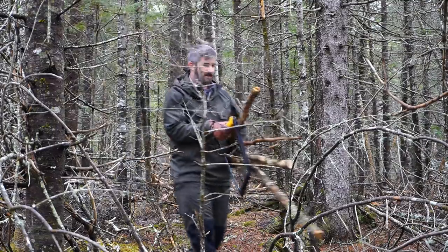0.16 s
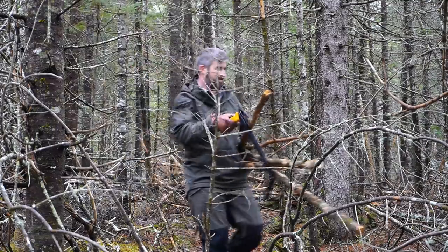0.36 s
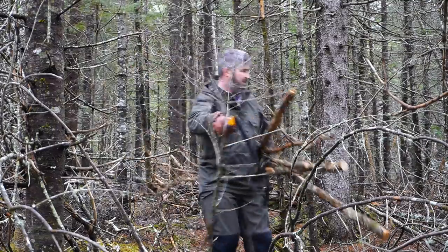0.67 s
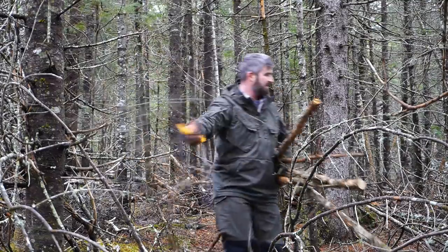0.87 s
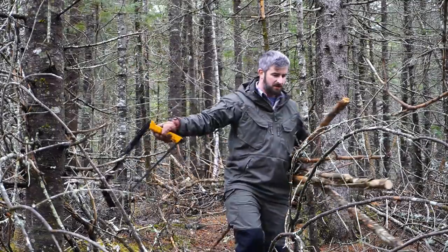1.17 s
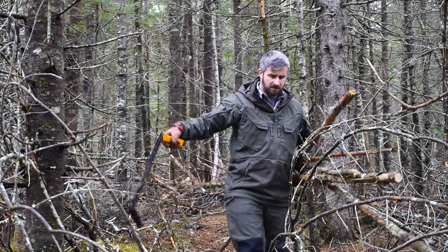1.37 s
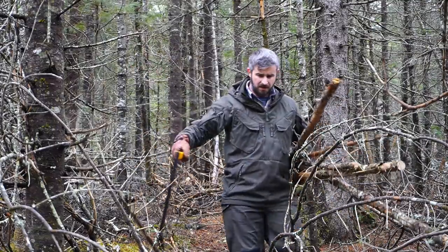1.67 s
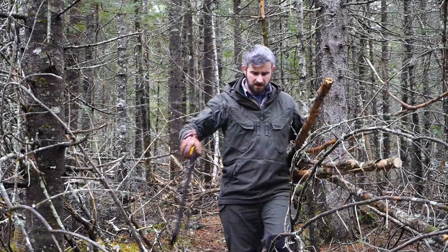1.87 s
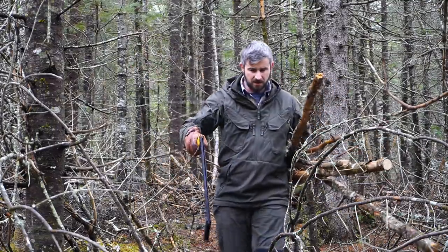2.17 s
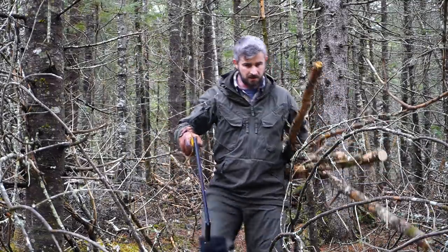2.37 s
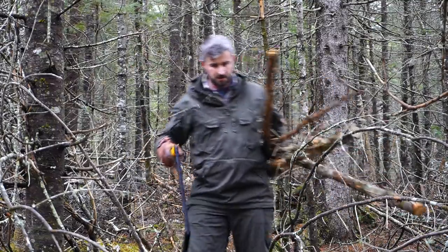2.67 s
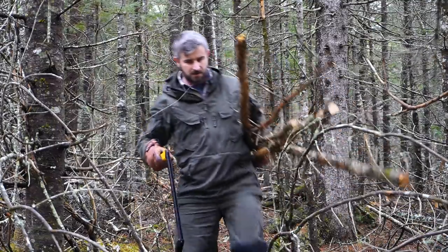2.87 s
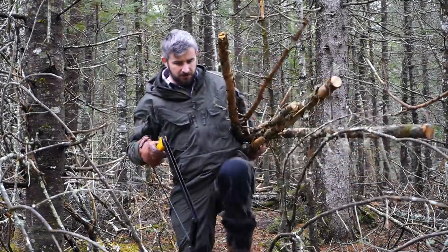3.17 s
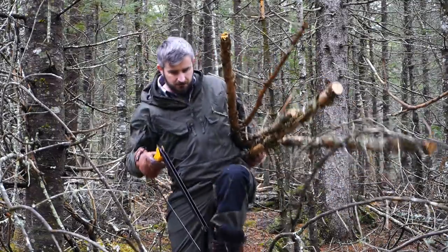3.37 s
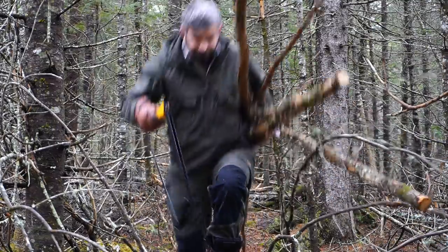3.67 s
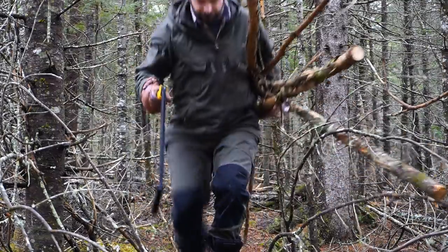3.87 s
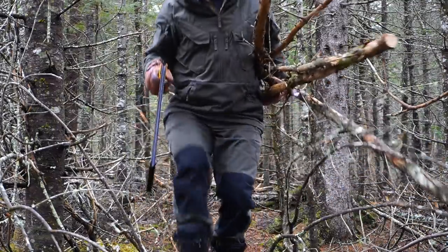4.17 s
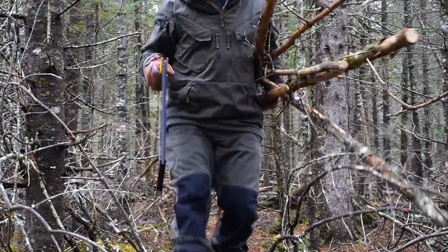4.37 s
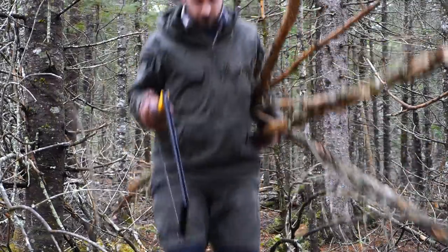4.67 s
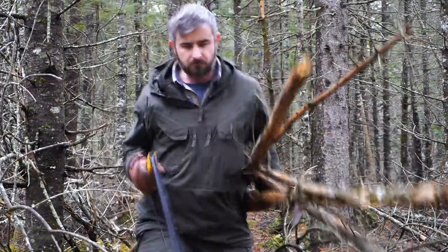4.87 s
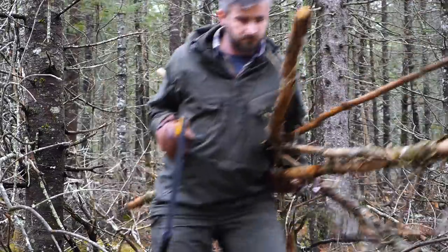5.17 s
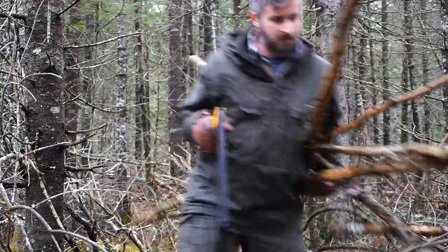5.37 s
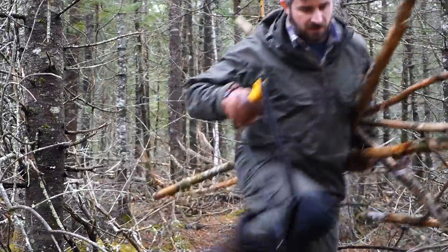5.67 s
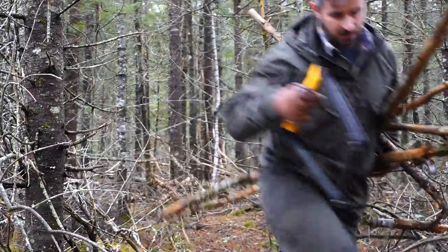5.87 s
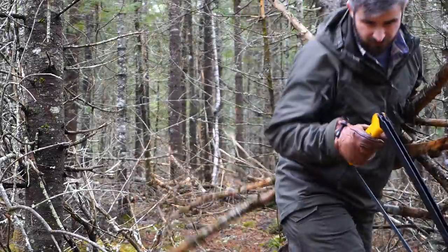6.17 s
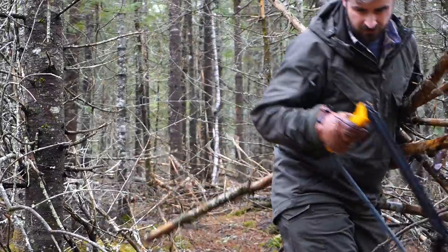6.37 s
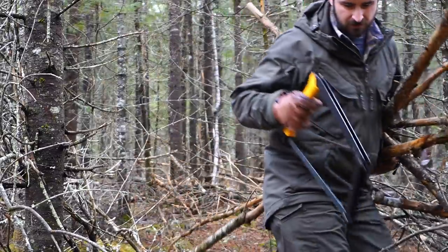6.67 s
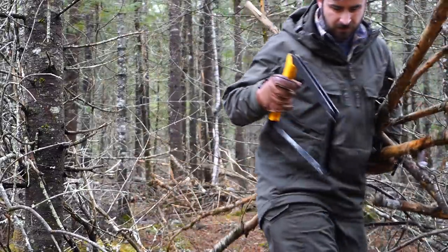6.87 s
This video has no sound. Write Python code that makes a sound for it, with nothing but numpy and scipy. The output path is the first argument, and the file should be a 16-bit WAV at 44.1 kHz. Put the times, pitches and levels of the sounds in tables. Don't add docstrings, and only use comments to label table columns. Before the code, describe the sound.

Close mono sound of dead branches in a forest. Soft twig snaps, low knocks and light metallic pings mix with dry rustling for two seconds, then a sparse lull with sleeve hiss and a few sharper snaps. After four seconds comes a tiny wood squeak and a triple crack, then a dense burst of bright, hard breaking. Clacks, scratchy brushing and jolting thuds continue unevenly to the end over faint air rumble.

```python
import sys
import numpy as np
from scipy import signal
from scipy.fft import rfft, irfft
from scipy.io import wavfile
from scipy.ndimage import uniform_filter1d

SR = 44100
rng = np.random.default_rng(int(sys.argv[2]) if len(sys.argv) > 2 else 0)


def level_to_linear(level):
    exponent = np.asarray(level, float) / 20
    return 10 ** exponent


def int16_out(signal):
    q = np.round(np.clip(np.atleast_2d(signal).T, -1, 1) * 32767)
    wavfile.write(sys.argv[1], SR, q.astype(np.int16))


N = 309582

# (time [s], wood pitch [Hz], wood ring [dB], fibre crack [dB], splinter [dB])
BREAKS = [(0.5734, 4100, -21.5, -26.5, -17.5), (0.867, 3550, -22, -24.5, -31.5),
          (1.1434, 3670, -23, -28.5, -19.5), (2.3001, 3600, -20.5, -30, -18),
          (3.3608, 5750, -6.5, -16.5, -8), (3.361, 1560, -9, -40, -34), (3.5143, 3430, -20, -23, -19),
          (3.5159, 2390, -10, -15.5, -20), (4.324, 1900, 1.5, -17.5, -2), (4.3863, 1880, -1, -18.5, -5.5),
          (4.4779, 1900, -9, -19, -9.5), (4.557, 3780, -15, -48, -9), (4.5859, 3800, -7.5, -42, -23),
          (4.6081, 3520, 2, -14.5, -8.5), (4.648, 3610, 3, -37, -11), (4.75, 3240, -15.5, -20, -18),
          (4.8475, 8400, -4, -18, -4), (4.851, 2070, -4, -17.5, -21), (5.0776, 3120, -2, -22.5, -12.5),
          (5.1958, 4110, -17.5, -24, -19.5), (5.3477, 920, -1, -20, -20.5),
          (5.3866, 3870, -15, -19.5, -16.5), (5.637, 970, -4.5, -21, -24), (5.6691, 1840, -13, -25, -22.5),
          (6.041, 780, -5, -20, -26), (6.7026, 5540, -17, -29.5, -13), (6.8092, 1800, -6, -12.5, -0.5)]
# (time [s], wood pitch [Hz], wood ring [dB], fibre crack [dB], splinter [dB])
TEARS = [(0.0617, 2560, -41, -45.5, -45), (0.225, 955, -31, -49, -58), (0.4, 2110, -45, -38.5, -43.5),
         (0.628, 1800, -41, -32.5, -39), (0.8319, 3100, -31, -29.5, -41.5), (3.1486, 2600, -42, -49, -36.5),
         (3.594, 5470, -41, -41.5, -32), (4.812, 2180, -31, -25.5, -26), (4.8935, 1980, -12.5, -35, -37),
         (5.445, 1160, -20, -56, -52), (6.6034, 3540, -40, -46.5, -38)]
# (time [s], wood pitch [Hz], wood ring [dB], splinter [dB])
CLACKS = [(0.018, 3520, -30, -37), (0.1677, 980, -33, -64), (0.295, 1300, -36, -59),
          (0.6938, 2220, -26, -61), (1.0734, 3050, -31, -25.5), (2.6573, 1140, -38, -25),
          (3.999, 1380, -42, -60), (4.097, 1140, -27, -38), (4.162, 3080, -35, -43),
          (4.2338, 3900, -33, -34.5), (5.2813, 3440, -26.5, -24.5), (5.341, 1600, -28, -25),
          (5.479, 1780, -24, -19.5), (5.5962, 870, -22, -39), (5.6517, 1650, -38, -53),
          (5.702, 2320, -26.5, -35), (5.781, 1370, -30, -28), (5.8325, 2850, -24, -21),
          (5.86, 5900, -28, -23.5), (6.065, 3190, -18, -17.5), (6.181, 2850, -23.5, -28.5),
          (6.218, 1040, -37, -21), (6.2741, 1040, -18, -56), (6.395, 4530, -31, -31),
          (6.449, 5370, -40, -41), (6.518, 1670, -38, -41), (6.546, 1850, -18.5, -36),
          (6.7353, 4740, -27, -22), (6.8045, 4800, -26, -12), (6.8294, 4260, -22, -11.5),
          (6.828, 6050, -36, -9), (0.846, 2170, -20.5, -45), (0.852, 3500, -26, -35),
          (0.421, 2300, -34, -58), (5.433, 4000, -33, -39), (5.536, 2220, -34, -45),
          (5.559, 4000, -38, -46), (6.524, 2000, -34, -48), (6.645, 3500, -45, -47), (4.44, 4200, -38, -50),
          (4.539, 3000, -29, -41), (4.516, 3000, -34, -50), (4.621, 3600, -28, -29),
          (4.8865, 3500, -21, -33), (5.807, 1300, -26, -40), (5.954, 3000, -27.5, -37),
          (6.138, 2300, -29, -42), (6.814, 1900, -16.5, -29), (6.195, 2330, -25, -47)]
# (time [s], peak level [dB], pitch [Hz])
TICKS = [
    (4.953, -30, 4960),
    (4.9644, -27, 1690),
    (4.9788, -23.5, 1920),
    (5.0174, -28, 3360),
    (5.0337, -30, 1210),
    (5.1297, -33, 3230),
    (5.2965, -39, 2390),
    (5.4054, -17, 1300),
    (6.0402, -35, 2170),
    (6.2582, -32, 2410),
]
# (time [s], splinter level [dB], ring pitch [Hz])
TWIGS = [(0.206, -44, 5000), (0.463, -48, 3710), (1.254, -32.5, 3540), (1.325, -37, 3480),
         (1.397, -36.5, 8900), (1.521, -37, 7200), (2.07, -40, 8100), (2.134, -34, 4070),
         (2.283, -32, 9430), (2.629, -46, 9000), (2.645, -33, 9200), (2.727, -40, 8050),
         (3.12, -24.5, 8400), (3.66, -27.5, 8900), (3.858, -41, 7750), (3.974, -47, 3520),
         (4.008, -40, 3960), (4.137, -33, 3540), (4.6399, -2, 7200), (4.6478, -3, 7940), (4.6524, 7, 6800),
         (4.6557, -4, 8110), (4.658, -4.5, 5600), (4.664, -11, 7050), (4.6754, -10, 7600),
         (4.7698, 1.5, 8930), (4.775, -5, 7300), (4.794, -11, 7600), (4.8232, -24, 8510),
         (4.876, -15, 8100), (4.881, -14, 7680), (5.003, -23, 3500), (5.061, -33, 3660), (5.165, -33, 5560),
         (5.332, -17, 3840), (5.397, -14.5, 5900), (5.581, -39, 5200), (5.609, -15, 3700),
         (5.718, -30, 8600), (5.768, -26.5, 8080), (5.824, -31, 4180), (6.091, -18, 8850),
         (6.121, -7, 8600), (6.308, -37, 8800), (6.352, -26, 7750), (6.359, -21.5, 8400),
         (6.422, -27.5, 8500), (6.454, -24, 7800), (6.477, -26, 8900), (6.695, -25, 11900),
         (6.752, -27, 8250), (6.7734, -29, 7940), (6.779, -18, 6960), (6.814, -6, 9100), (6.832, -20, 8050),
         (6.925, -47, 8040), (6.95, -31.5, 7200), (4.561, -16, 7600), (0.813, -38, 6000),
         (3.111, -36, 10000)]
# (frequency [Hz], level [dB])
CRACK_SPECTRUM = [(500, -38), (1000, -2.5), (2500, 1.5), (5500, -3), (8000, -32)]
# (frequency [Hz], level [dB])
SPLINTER_SPECTRUM = [(4000, -11), (6000, -3.5), (8300, 3), (10000, -5), (13000, -5), (15500, -9),
                     (16500, -38)]
# (time [s], level [dB])
BOUGH_CRACKS = [
    (4.324, -12),
    (4.3859, -14.5),
    (4.4778, -18),
]
# (frequency [Hz], level [dB], t60 [s])
BOUGH_MODES = [(3920, -1, 0.011), (5280, 4.5, 0.0084), (6340, -7, 0.0084), (7800, 1, 0.0098),
               (9430, 8.5, 0.0059)]
# (time [s], peak level [dB], pitch [Hz])
KNOCKS = [(0.034, -41, 502), (0.167, -36, 920), (0.837, -31, 762), (1.193, -38.5, 236), (1.482, -42, 127),
          (1.612, -48, 960), (1.995, -41.5, 290), (2.067, -38, 125), (2.299, -39.5, 535), (2.381, -41, 483),
          (2.607, -37.5, 151), (3.358, -32.5, 228), (3.511, -42.5, 174), (3.798, -43.5, 507),
          (3.987, -38.5, 534), (4.533, -35.5, 236), (4.556, -34, 247), (4.674, -25.5, 473),
          (4.997, -38, 543), (5.207, -32, 517), (5.31, -20, 474), (5.346, -20.5, 279), (5.442, -29, 810),
          (5.927, -25.5, 103), (6.038, -28, 916), (6.199, -21.5, 330), (6.515, -31, 260), (6.783, -25, 482),
          (6.808, -19, 432), (6.855, -25.5, 505), (1.342, -45.5, 372), (6.798, -32.5, 604),
          (6.845, -29, 428), (4.588, -41, 415), (4.665, -32, 387), (5.93, -37, 694), (5.796, -36, 1130),
          (5.905, -39, 1000), (6.226, -30, 940), (0.74, -48, 590), (2.301, -38.5, 308)]
# (time [s], peak level [dB], pitch [Hz])
JOLTS = [(0.093, -37.5, 335), (0.263, -45, 490), (0.763, -33.5, 366), (0.801, -37, 452),
         (1.011, -37.5, 393), (1.092, -45, 420), (1.317, -30.5, 373), (1.519, -37, 349), (2.654, -42, 416),
         (2.894, -49, 570), (3.667, -44.5, 616), (4.026, -42.5, 500), (4.323, -26, 380),
         (4.384, -26.5, 358), (4.476, -29.5, 377), (4.605, -31.5, 420), (4.654, -26.5, 317),
         (4.728, -34, 597), (4.742, -28.5, 380), (4.766, -27, 322), (4.793, -21.5, 358), (4.801, -29, 600),
         (4.81, -24, 617), (4.825, -50, 640), (4.844, -26.5, 437), (5.266, -29.5, 300), (5.288, -29.5, 480),
         (5.324, -27.5, 500), (5.358, -20.5, 295), (5.377, -30, 640), (5.386, -19.5, 398),
         (5.409, -29, 216), (5.511, -42, 260), (5.583, -36, 380), (5.591, -25.5, 300), (5.621, -37, 276),
         (5.639, -22.5, 365), (5.666, -27.5, 362), (5.684, -38, 403), (5.76, -39, 325), (5.825, -41, 464),
         (5.888, -25.5, 396), (5.901, -27, 312), (5.918, -32, 415), (5.958, -34.5, 608), (6.163, -38, 390),
         (6.221, -32.5, 428), (6.262, -38, 480), (6.318, -44, 415), (6.4, -39.5, 476), (6.545, -32, 332),
         (6.757, -36, 302), (6.825, -37, 420), (6.833, -30.5, 452)]
# (time [s], level [dB], centre [Hz], t60 [s])
SWEEPS = [(0.498, -34.5, 4760, 0.041), (0.532, -41.5, 7000, 0.16), (.585, -37.5, 7000, 0.3),
          (0.987, -36.5, 9000, 0.03), (3.129, -35, 7900, 0.032), (3.52, -39.5, 5960, 0.24),
          (3.65, -46.5, 894, 0.48), (4.035, -49, 2480, 0.49), (4.088, -42, 3930, 0.083),
          (4.485, -65, 5000, 0.45), (4.657, -24, 9000, 0.33), (4.95, -32.5, 6000, 0.094),
          (5.13, -31, 1860, 0.049), (5.294, -29.5, 6000, 0.063), (5.401, -25, 3840, 0.06),
          (5.517, -29, 6050, 0.037), (5.9, -39.5, 4320, 0.25), (6.834, -36, 6000, 0.12)]
# (time [s], peak level [dB], mode nearest the spot [Hz])
SCRAPES = [(.38, -42.5, 2130), (0.401, -34, 2455), (.453, -49, 1900), (.495, -44, 2320), (.531, -48, 2010),
           (.6295, -33, 4300), (0.596, -38, 2060), (.629, -28.5, 1900), (0.634, -30.5, 2320),
           (0.695, -36, 2010), (1.103, -54, 1900), (1.141, -47, 2568), (1.189, -50.5, 1900),
           (1.46, -54, 2455), (1.486, -56, 1996), (1.501, -52, 2568), (1.076, -45, 3000),
           (1.735, -53, 1900), (1.659, -54, 2132), (1.685, -51.5, 1900), (1.757, -49.5, 1900),
           (1.832, -43, 2070), (1.849, -46.5, 1900), (1.87, -43, 2020), (1.897, -50, 1900),
           (1.917, -38.5, 1900), (1.954, -49.5, 2132), (1.997, -60, 2132), (2.03, -71, 2132)]
# (frequency [Hz], level [dB], t60 [s])
FRAME_MODES = [(1900, 15.5, 0.19), (1996, 15.5, 0.13), (2132, -16, 0.32), (2320, 7, 0.19), (2455, 6, 0.15),
               (2568, -3, 0.22), (2670, -23, 0.17), (3000, 7, 0.095), (3900, -16, 0.15), (4300, -2, 0.054)]
# (time [s], effort [dB])
PUSH = [(0.0, -55), (.31, -56.5), (.6, -49), (1.06, -52.5), (1.52, -62.5), (1.84, -55), (2.44, -69),
        (2.7, -64), (3.2, -58), (4.3, -63.5), (4.62, -50.5), (4.75, -40), (5.05, -51.5), (5.34, -46),
        (6.0, -57), (6.25, -48.5), (6.49, -57), (7.02, -61)]
# (time [s], effort [dB])
DRAG = [(0.0, -56.5), (.51, -59.5), (.95, -51), (1.52, -62.5), (1.84, -56.5), (2.44, -62), (2.79, -58.5),
        (3.3, -61.5), (4.09, -59.5), (4.36, -64), (4.75, -35.5), (5.1, -48), (5.34, -41.5), (5.92, -47.5),
        (6.01, -54), (6.22, -44), (6.49, -55), (7.02, -56)]
# (frequency [Hz], level [dB per Hz])
RUB_SPECTRUM = [(18, -40), (30, -10), (162, -2), (217, 3.5), (405, 1.5), (1100, -0.5), (1500, -1.5),
                (1950, -7), (3300, -120)]
# (frequency [Hz], level [dB per Hz])
SCRATCH_SPECTRUM = [(500, 9), (900, -4), (2000, 6), (4000, 1.5), (7000, -16.5)]
# (frequency [Hz], level [dB per Hz])
HISS_SPECTRUM = [(1760, -87), (3000, -8), (3360, -5), (4470, -2), (5890, -3), (8290, 4.5), (10000, -2.5),
                 (14900, -5), (15900, -36), (16400, -42)]
# (time [s], peak level [dB])
SLIPS = [
    (4.063, -31),
    (4.07, -21.5),
    (4.085, -30),
]
# (frequency [Hz], width [Hz], level [dB])
WEAVE_RIDGES = [(2170, 76, -3), (2400, 32, 3), (3780, 200, -5), (4850, 36, 1), (5280, 80, -1),
                (6100, 220, -11), (7120, 100, -10), (7700, 400, -1), (8400, 160, -3), (8900, 38, -4),
                (9480, 110, -9), (10200, 200, -8)]
# (frequency [Hz], t60 [s])
WOODS_DECAY = [(300, 0.13), (2000, 0.15)]
# (frequency [Hz], level [dB per Hz])
AIR_SPECTRUM = [(12, -32), (20, -0.5), (32, -18), (75, -6.5), (139, -24.5), (707, -19), (3400, -32),
                (3810, -29.5), (14600, -43), (16400, -50)]


def evened(x):
    return x / np.sqrt(np.mean(x ** 2) + 1e-20)


def onset(t, rise_s, power=1):
    return 1 - np.exp(-(t / rise_s) ** power)


def decay(t, t60_s):
    return level_to_linear(-60 * t / t60_s)


def read(points, hz):
    f, value = np.transpose(points)
    return np.interp(np.log(hz + 1), np.log(f + 1), value)


def effort(rows):
    times, level_db = np.transpose(rows)
    return np.interp(np.arange(N) / SR, times, level_db, left=-120, right=-120)


def add(mix, s, sound):
    part = mix[round(s * SR):][:len(sound)]
    part += sound[:len(part)]


def colour(x, points):
    hz = np.fft.rfftfreq(N, 1 / SR)
    below = (points[0][0] * .5, points[0][1] - 40)
    above = (points[-1][0] * 1.05, -90)
    gain = level_to_linear(read([below] + list(points) + [above], hz))
    return evened(irfft(rfft(x) * gain, N))


def tinted(noise, points):
    hz = np.fft.rfftfreq(noise.shape[-1], 1 / SR)
    out = irfft(rfft(noise) * level_to_linear(read(points, hz)), noise.shape[-1])
    return out / out.std(-1, keepdims=True)


def snaps():
    out, t = np.zeros(N), np.arange(9000) / SR
    rows = snap_rows()
    noise = rng.standard_normal((len(rows), 2, len(t)))
    noise[:, :, round(.0004 * SR)] = 3.5
    cracks = tinted(noise[:, 0], CRACK_SPECTRUM)
    splinters = tinted(noise[:, 1], SPLINTER_SPECTRUM)
    dulled = signal.lfilter([.45], [1, -.55], splinters)
    rise = onset(t, 0.00029, 2)
    tear = level_to_linear(-5.0) * decay(t, 0.0012)
    late = level_to_linear(-13.5) * decay(t, 0.041)
    scatter = level_to_linear(-26.5) * decay(t, 0.38) * onset(t, 0.0016)
    for row, crack, splinter, dull in zip(rows, cracks, splinters, dulled):
        s, hz, wood_db, crack_db, splinter_db, t60 = row
        t60 = np.clip(t60, .004, .1)
        shape = rise * (tear + level_to_linear(-3.5) * decay(t, t60) + late)
        ring = np.sin(2 * np.pi * hz * t) + .5 * np.sin(2 * np.pi * 1.219 * hz * t)
        ring *= onset(t, 1.54 / hz, 2)
        wood = level_to_linear(wood_db + 1.0) * decay(t, np.clip(t60, .0055, .02)) * ring
        burst = level_to_linear(crack_db - 0.5) * crack + level_to_linear(splinter_db - 3.0) * splinter
        add(out, s, wood + shape * burst)
        scattered_crack = (level_to_linear(crack_db) + 0.015 * level_to_linear(wood_db)) * crack
        add(out, s, scatter * (scattered_crack + level_to_linear(splinter_db - 0.5) * dull))
    return signal.sosfilt(signal.butter(2, 350, "highpass", fs=SR, output="sos"), out)


def snap_rows():
    rows = [(*row, 0.007) for row in BREAKS] + [(*row, 0.17) for row in TEARS]
    clack_t60_s, clack_fibre_db = 0.01, -9
    for s, hz, db, splinter_db in CLACKS:
        rows.append((s, hz, db, db + clack_fibre_db, splinter_db, clack_t60_s))
    for s, db, hz in TICKS:
        rows.append((s, hz, db, db + clack_fibre_db, db - 16, clack_t60_s))
    for s, db, hz in TWIGS:
        rows.append((s, hz, db - 10.5, db - 24, db - 8.0, 0.0098))
    return rows


def bough():
    out, t = np.zeros(N), np.arange(1500) / SR
    hz, db, t60 = np.transpose(BOUGH_MODES)[:, :, None]
    turns = rng.random((len(BOUGH_CRACKS), len(BOUGH_MODES), 1))
    for (s, crack_db), turn in zip(BOUGH_CRACKS, turns):
        modes = level_to_linear(db) * decay(t, t60) * np.sin(2 * np.pi * (hz * t + turn))
        add(out, s, level_to_linear(crack_db) * onset(t, 0.00056, 2) * modes.sum(0))
    return out


def knocks():
    out, t = np.zeros(N), np.arange(3000) / SR
    rows = list(KNOCKS) + list(JOLTS)
    bark = signal.lfilter([.15], [1, -.88], rng.standard_normal((len(rows), len(t))))
    for (s, peak_db, hz), (detune, turn), crunch in zip(rows, rng.random((len(rows), 2)), bark):
        sagging = hz * (t + 0.13 * 0.0036 * onset(t, 0.0009))
        second_hz = hz * (1.287 + 0.905 * detune)
        ring = np.sin(2 * np.pi * sagging) + 0.51 * np.sin(2 * np.pi * (second_hz * t + turn))
        shape = onset(t, 0.0025, 2) * decay(t, 0.029)
        push = 0.35 * np.sin(2 * np.pi * (130 + 80 * turn) * t)
        push *= onset(t, 0.0037) * decay(t, 0.041)
        hum = 0.042 * (1 + 1.6 * crunch) * np.sin(2 * np.pi * hz * t)
        hum *= onset(t, 0.003, 2) * decay(t, 0.065)
        add(out, s, level_to_linear(peak_db + 8.0) * (shape * (ring + 0.98 * crunch) + push + hum))
    return out


def sweeps():
    out, t = np.zeros(N), np.arange(8000) / SR
    noise, prickle = rng.standard_normal((2, len(SWEEPS), len(t)))
    prickle = level_to_linear(0.56 * evened(uniform_filter1d(prickle, 90)))
    for (s, level_db, hz, t60), row in zip(SWEEPS, noise * prickle):
        band = tinted(row, [(hz / 5, -24), (hz / 3.8, -3), (hz, 0), (hz * 2.24, -5), (hz * 4, -24)])
        add(out, s, level_to_linear(level_db) * decay(t, t60) * onset(t, 0.002) * band)
    return out


def saw_frame():
    out, t = np.zeros(N), np.arange(SR // 4) / SR
    hz, db, t60 = np.transpose(FRAME_MODES)[:, :, None]
    chances = rng.random((len(SCRAPES), 3, len(FRAME_MODES), 1))
    for (s, peak_db, spot_hz), (turn, luck, sway) in zip(SCRAPES, chances):
        free, rise_s = (.5, .0004) if s < 1 else (1.2, .003)
        waver_db = 3.2 * np.sin(2 * np.pi * ((12 + 25 * sway) * t + turn))
        envelope = level_to_linear(waver_db) * decay(t, free * t60) * onset(t, rise_s)
        weight = np.exp(-((hz - spot_hz) / 50) ** 2) + level_to_linear(db - 18.0 - 4.3 * luck)
        modes = weight * envelope * np.sin(2 * np.pi * (hz * t + turn))
        add(out, s, level_to_linear(peak_db) * modes.sum(0))
    return out


def rustle():
    rub = colour(grains(per_s=170, spread_db=5.0, size=260, wash=0.4), RUB_SPECTRUM)
    dull, thin = (grains(per_s=270, spread_db=1.5, size=90, wash=0.94) for _ in range(2))
    thin = signal.lfilter([1, -1], [1], thin)
    scratch = patchy(colour(dull + 2.0 * thin, SCRATCH_SPECTRUM), patchy_db=3.5)
    fine = 0.049 * thin + grains(per_s=340, spread_db=-3.5, size=70, wash=1.0)
    hiss = patchy(colour(fine, HISS_SPECTRUM), patchy_db=5.5)
    crackle = grains(per_s=94, spread_db=3.0, size=24, wash=0)
    crackle = patchy(colour(crackle, CRACK_SPECTRUM + SPLINTER_SPECTRUM[3:]), patchy_db=3.0)
    hiss_db = np.interp(np.arange(N) / SR, (1.5, 4.1), (-8, -1))
    brush = scratch + level_to_linear(-21) * crackle + level_to_linear(hiss_db) * hiss
    return level_to_linear(effort(DRAG)) * rub + level_to_linear(effort(PUSH)) * brush


def grains(per_s, spread_db, size, wash):
    ticks = level_to_linear(spread_db * np.minimum(rng.exponential(1, N), 3))
    ticks *= rng.random(N) < per_s / SR
    swelling = uniform_filter1d(ticks, int(size / 2) + 1)
    puffs = signal.lfilter([1], [1, -np.exp(-1 / size)], swelling)
    return (evened(puffs) + wash) * rng.standard_normal(N)


def patchy(x, patchy_db):
    z = signal.stft(x, nperseg=256, noverlap=192)[2]
    over_hz = uniform_filter1d(rng.standard_normal(z.shape), size=4, axis=0)
    patches = evened(uniform_filter1d(over_hz, size=9, axis=1))
    return evened(signal.istft(z * level_to_linear(patchy_db * patches), nperseg=256, noverlap=192)[1][:N])


def squeak():
    squeak_hz, sag_hz_per_s = 2270, 7700
    grip_db_per_s, fade_db_per_s = 7000, 2600
    out, t = np.zeros(N), np.arange(-400, 2400) / SR
    phase = 2 * np.pi * (squeak_hz * t - .5 * sag_hz_per_s * t ** 2)
    start, level = SLIPS[0][0], 0
    for s, db in SLIPS:
        since = t + start - s
        level = level + level_to_linear(db + np.minimum(grip_db_per_s * since, -fade_db_per_s * since))
    add(out, start + t[0], level * (np.sin(phase) + 0.047 * np.sin(2 * phase)))
    return out


def sleeve():
    centre_s, length_s, level_db = 3.184, 0.45, -54.5
    hz = np.fft.rfftfreq(N, 1 / SR)
    ridges = level_to_linear(-16.0)
    for f, width, db in WEAVE_RIDGES:
        ridges = ridges + level_to_linear(db) / (1 + (2 * (hz - f) / width) ** 2)
    band = level_to_linear(read([(900, -36), (1600, -3), (11000, 0), (14500, -4), (15900, -50)], hz))
    swell = np.cos(np.pi * np.clip((np.arange(N) / SR - centre_s) / length_s, -.5, .5))
    hiss = irfft(rfft(rng.standard_normal(N)) * band * ridges, N)
    return level_to_linear(level_db) * swell * evened(hiss)


def woods(x):
    hz, t, z = signal.stft(rng.standard_normal(SR // 2), SR, nperseg=128)
    fading = z * decay(t, read(WOODS_DECAY, hz)[:, None])
    tail = signal.istft(fading, SR, nperseg=128)[1]
    tail *= onset(np.arange(len(tail)), 200)
    return signal.fftconvolve(x, tail / np.linalg.norm(tail))[:N]


def air():
    return level_to_linear(-57 - 5.0) * colour(rng.standard_normal(N), AIR_SPECTRUM)


def scene():
    hits = knocks() + saw_frame()
    close = snaps() + bough() + sweeps() + squeak() + rustle() + sleeve()
    scattered = level_to_linear(-9.0) * woods(hits + 0.43 * squeak())
    return np.tile(close + hits + scattered + air(), (2, 1))


def low_pass(x):
    return signal.sosfilt(signal.butter(12, 16540, fs=SR, output="sos"), x)


def record(dry):
    edge = signal.firwin(255, 16000, window=("kaiser", 9), fs=SR)
    limited = signal.oaconvolve(np.clip(dry, -.93, .93), edge[None], "same")
    return low_pass(limited)


dry = scene()
out = record(dry)
int16_out(out)
```